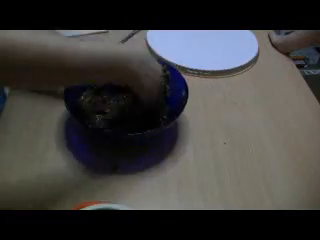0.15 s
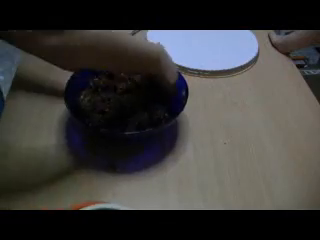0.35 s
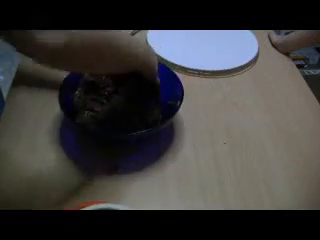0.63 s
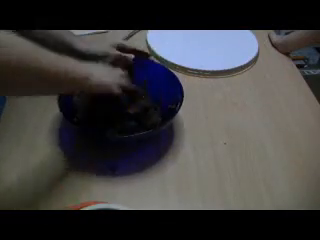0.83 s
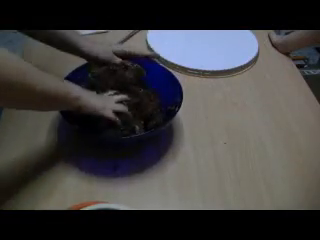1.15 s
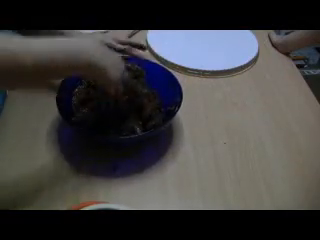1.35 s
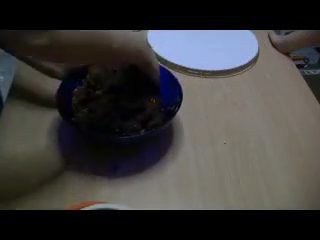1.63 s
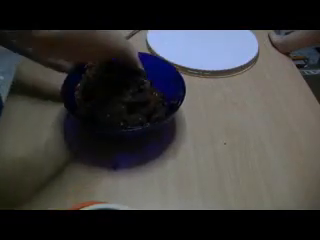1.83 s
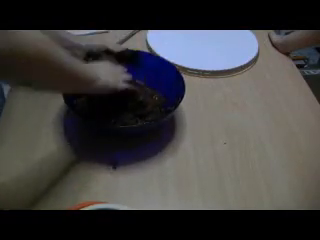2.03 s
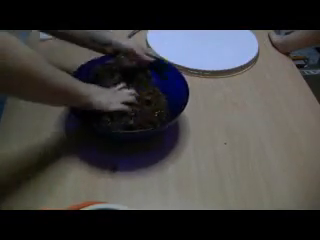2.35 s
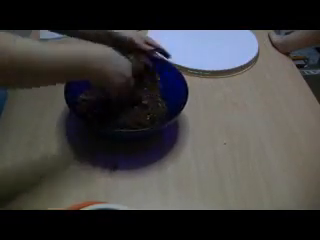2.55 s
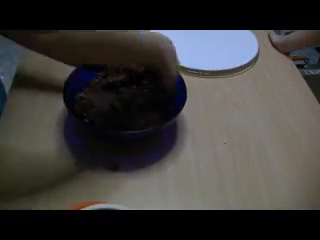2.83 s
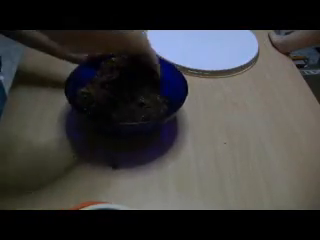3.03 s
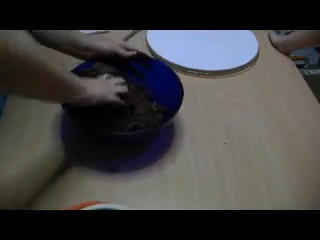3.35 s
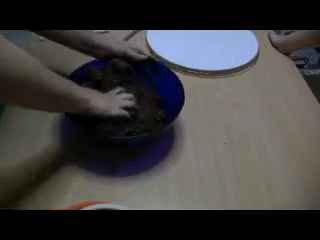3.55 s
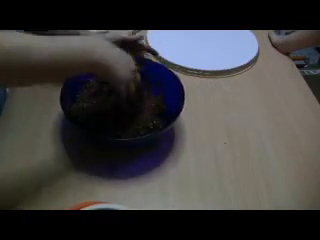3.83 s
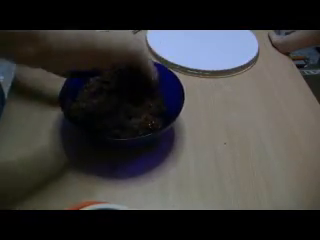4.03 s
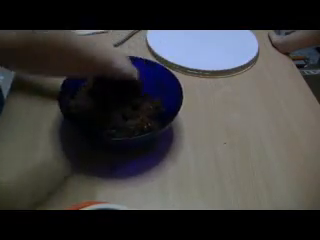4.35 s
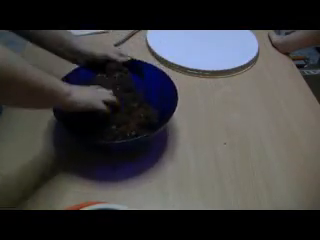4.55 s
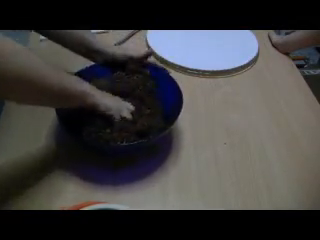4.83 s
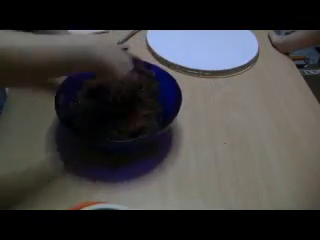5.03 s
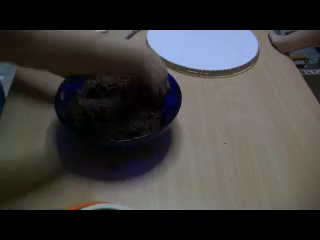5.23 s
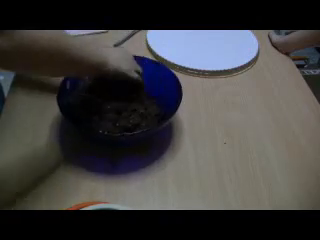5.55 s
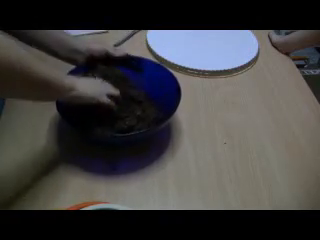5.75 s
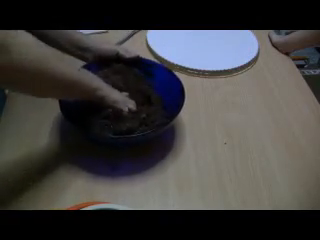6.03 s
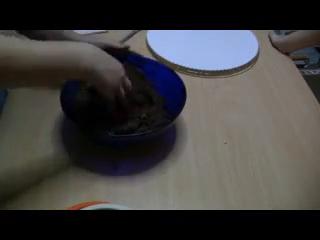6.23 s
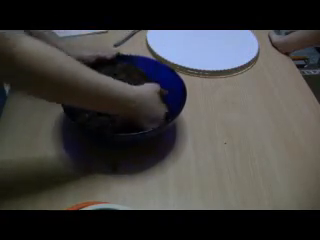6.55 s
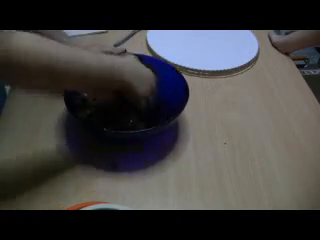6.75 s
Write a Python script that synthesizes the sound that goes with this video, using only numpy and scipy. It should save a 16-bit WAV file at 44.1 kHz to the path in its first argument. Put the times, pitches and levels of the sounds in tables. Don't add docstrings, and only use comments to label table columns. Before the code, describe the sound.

Close in a hard-walled, quiet kitchen, hands rake and press crumbly dough in a glass bowl with uneven dry rustles and scrapes. The bowl lands on a wooden table in clattering knocks early, around two seconds and past four. A finger ring clinks brightly on the rim four times, amid small snaps, pops and a faint squeak. A stereo microphone sits about a metre away, over faint appliance hum.

```python
import sys
import numpy as np
from scipy import signal
from scipy.fft import rfft, irfft
from scipy.io import wavfile
from scipy.ndimage import uniform_filter1d

SR = 44100
rng = np.random.default_rng(int(sys.argv[2]) if len(sys.argv) > 2 else 0)


def undo_db(level):
    steps = np.asarray(level, float) / 20
    return 10 ** steps


def wrap_up_sound(samples):
    columns = np.atleast_2d(samples).T
    tamed = np.clip(columns, -1, 1)
    steps = np.round(tamed * 32767).astype(np.int16)
    wavfile.write(sys.argv[1], SR, steps)


N = 303530

# frequency in Hz, likeness from 0 to 1.
SAME_AIR = [(130, 0.49), (300, 0.042), (1000, 0.045), (3000, 0.58), (14000, 0.71)]


def evened(x):
    return x / np.sqrt(np.mean(x ** 2) + 1e-20)


def read(points, hz):
    f, value = np.transpose(points)
    return np.interp(np.log(hz + 1), np.log(f + 1), value)


def add(mix, s, sound):
    part = mix[round(s * SR):][:len(sound)]
    part += sound[:len(part)]


def coloured(x, points):
    half = read(points, np.fft.rfftfreq(4096, 1 / SR)) / 20 * np.log(10)
    log_gain = np.r_[half, half[-2:0:-1]]
    taps = np.fft.ifft(np.exp(np.conj(signal.hilbert(log_gain)))).real[:2048]
    taps = taps.reshape((1,) * (x.ndim - 1) + (-1,))
    return signal.oaconvolve(x, taps, axes=-1)[..., :x.shape[-1]]


def ring(hz, db, t60, size):
    t = np.arange(size)[:, None] / SR
    return (undo_db(db - 60 * t / t60) * np.sin(2 * np.pi * hz * t)).sum(1)


def diffuse(pair, likeness):
    same = np.clip(read(likeness, np.fft.rfftfreq(pair.shape[1], 1 / SR)), 0, 1)
    a, b = rfft(pair)
    shared, own = np.sqrt((1 + same) / 2) * a, np.sqrt((1 - same) / 2) * b
    return irfft(np.array([shared + own, shared - own]), pair.shape[1])


def kitchen():
    # frequency in Hz, level in dB per Hz.
    air_colour = [(40, -55), (75, -3), (105, -10.5), (200, -20), (330, -11.5), (500, -10.5), (700, -9.5),
                  (1000, -14.5), (2500, -19.5), (12500, -32.5), (16000, -33)]
    # frequency in Hz, level in dB rms.
    hum = [(396, -73), (490, -66), (641, -63), (765, -72.5), (852, -68), (926, -69.5), (1290, -74.5),
           (13680, -71.5)]
    t = np.arange(N) / SR
    hiss = evened(coloured(rng.standard_normal((2, N)), air_colour))
    air = undo_db(-54.5) * diffuse(hiss, SAME_AIR)
    for hz, db in hum:
        drift = np.cumsum(uniform_filter1d(rng.standard_normal(N), 2000)) * 0.00001 * hz
        waver_db = 3 * evened(uniform_filter1d(rng.standard_normal(N), 4000))
        air = air + undo_db(db + 2.5 + waver_db) * np.sin(2 * np.pi * hz * t + drift)
    return air


def grains(per_s, spread_db):
    size = undo_db(spread_db * np.minimum(rng.exponential(1, (2, N)), 4)) * rng.standard_normal((2, N))
    return size * (rng.random((2, N)) < per_s / SR)


def strokes(table, level_db, linger):
    rise_db, release_db_per_s = 21.5, 163
    t = np.arange(0, N + 64, 64) / SR
    s, hold, _, rise, _ = np.transpose(table)[..., None]
    before_db = rise_db * np.maximum(s - t, 0) / rise
    after_db = linger * release_db_per_s * np.maximum(t - s - hold, 0)
    power = (undo_db(level_db[:, None] - before_db - after_db) ** 2).sum(0)
    return np.interp(np.arange(N) / SR, t, np.sqrt(power))


def kneading():
    # frequency in Hz, dB per Hz.
    rustle_colour = [(1470, -36.5), (2500, -8), (2740, -7.5), (3690, -5.5), (7080, -5.5), (12400, -7.5),
                     (15000, -13), (16000, -68)]
    scrape_colour = [(300, -31), (700, -8.5), (1300, 1), (2500, -4.5), (4000, -13), (7000, -21.5)]
    push_colour = [(60, -4), (110, -22.5), (250, -5), (500, -1.5), (900, -3.5), (1800, -21)]
    # full speed reached in seconds, hold in seconds, rustle in dB,
    # rise in seconds, weight on the glass in dB over the rustle.
    rakes = [(.075, 0.0056, -48.5, 0.59, -8.5), (.335, 0.016, -60, .02, -6), (.44, 0.01, -52.5, 0.12, -4.5),
             (.5, 0.26, -59, 0.087, -4), (.775, 0.41, -56, 0.38, -4.5), (1.25, 0.013, -48, 0.1, -1.5),
             (1.368, 0.006, -39, 0.096, -10.5), (1.97, 0.11, -52, 0.074, 8.5), (2.2, 0.25, -59, 0.29, 5),
             (2.561, 0.095, -47.5, 0.073, -5), (3.32, 0.16, -51, 0.63, -14), (3.55, 0.29, -56, 0.15, -11),
             (3.84, 0.034, -45.5, 0.26, -5), (4.105, .07, -61.5, .02, -7), (4.44, 0.051, -49, 0.24, 6),
             (4.7, 0.21, -55.5, 0.73, 4), (5.05, 0.031, -42, 0.17, -7), (5.35, 0.14, -55, 0.11, -15),
             (5.62, 0.073, -47, 0.16, -4.5), (5.78, 0.034, -53, 0.35, -21), (5.97, 0.15, -54.5, 0.45, -4),
             (6.23, 0.048, -44, 0.14, -18), (6.6, 0.13, -55.5, 0.22, -5), (6.86, .02, -45, 0.15, -9)]
    # full weight reached in seconds, hold in seconds, drag on the glass in dB,
    # rise in seconds, push on the table in dB over the drag.
    presses = [(.02, 0.01, -50.5, 0.48, 2), (.36, 0.069, -77, .05, 1), (1.76, 0.1, -55, 0.12, 3.5),
               (2.3, 0.068, -54, 0.13, 1.5), (2.46, 0.11, -59, 0.13, 10), (2.74, 0.014, -62.5, 0.06, 6),
               (3.21, 0.011, -51.5, 0.29, -40), (3.3, 0.12, -71, 0.043, 17.5),
               (3.74, 0.019, -52, 0.62, -4.5), (4.76, 0.06, -59, 0.27, 2.5), (4.97, 0.024, -53.5, 0.066, 2),
               (5.17, 0.017, -68, 0.16, 10), (5.47, 0.087, -51, 0.21, 2.5), (6.17, 0.053, -48, 0.072, -7),
               (6.7, 0.21, -54.5, 0.11, -8)]
    rustle_db, weight_db = np.transpose(rakes)[2::2]
    drag_db, lean_db = np.transpose(presses)[2::2]
    glass_db = rustle_db + weight_db
    scrape_db = np.r_[glass_db, drag_db]
    push_db = np.r_[-70 + 0.64 * (glass_db + 70), drag_db + lean_db]
    flutter = uniform_filter1d(uniform_filter1d(rng.standard_normal(N), 600), 600)
    flutter_db = 0.7 * evened(flutter)
    both = rakes + presses
    rustle = evened(coloured(grains(9000, 0.63), rustle_colour)) * strokes(rakes, rustle_db, linger=1)
    scrape = evened(coloured(grains(3000, 0.96), scrape_colour)) * strokes(both, scrape_db, linger=0.6)
    push = evened(coloured(grains(1200, 0.79), push_colour)) * strokes(both, push_db, linger=0.8)
    return diffuse(undo_db(flutter_db) * (rustle + scrape + push), SAME_AIR)


def knocks():
    # start in seconds, peak in dB, pitch of the push in Hz, chatter in dB over it.
    blows = [(0.105, -37, 332, -2), (0.343, -46.5, 245, -10), (0.606, -36, 394, -8),
             (.625, -24.5, 279, -2.5), (0.6374, -14.5, 473, -4.5), (.655, -43, 765, -14),
             (1.242, -45.5, 750, 7.5), (1.348, -47, 740, 12), (1.747, -39.5, 320, -3),
             (1.889, -35, 304, -9), (1.92, -33, 350, 3), (1.9403, -19.5, 274, -2), (1.996, -7.5, 366, -8),
             (2.017, -16.5, 450, 2), (2.031, -22, 1030, -20), (2.048, -20, 415, -25), (2.169, -36, 443, 0),
             (3.3913, -23, 340, -9), (3.407, -39, 500, -13), (3.47, -40, 530, -3), (3.728, -41, 617, -1),
             (3.878, -45.5, 333, 6), (4.357, -37, 400, 5), (4.37, -21.5, 277, -4), (4.412, -16.5, 270, -24),
             (4.422, -12, 383, 5.5), (4.428, -14.5, 530, -4), (4.439, -19, 570, 0.5),
             (5.967, -31.5, 520, -13), (5.973, -38, 423, 5), (5.98, -37, 454, 0), (5.992, -38, 750, -4),
             (6.13, -38.5, 487, 3.5)]
    # level in dB and t60 in seconds in each row, then their frequencies in Hz.
    modes = [(2, 0.084), (-33, 0.03), (0, 0.54), (-4.5, 0.38), (-7, 0.3), (-6.5, 0.22), (-5, 0.25),
             (-4, .2), (3, .12), (-17, 0.15), (-1, 0.13), (-3.5, 0.13), (-12, 0.16), (-1.5, 0.09),
             (-2, 0.03), (-19, 0.042), (-6, 0.038), (-30, 0.021), (-13, .014), (-25, .012)]
    mode_hz = [115, 200, 250, 325, 362, 397, 456, 543, 592, 688, 770, 826, 906, 1005, 1193, 1290, 1440,
               1650, 2200, 3000]
    # frequency in Hz, level in dB.
    grit_colour = [(500, -29), (1300, -10), (2300, 6), (3500, 1), (5500, -8), (9000, -32)]
    direct, force, grit = np.zeros((3, N))
    t = np.arange(9000) / SR
    gaps = np.diff([row[0] for row in blows], append=N / SR)
    for (s, db, hz, chatter_db), gap in zip(blows, gaps):
        u = t * hz
        push = np.sin(2 * np.pi * u) * np.tanh(2.1 * u) * np.exp(-(u / 0.84) ** 2)
        add(direct, s, -0.8 * undo_db(db) * push)
        contact_hz = 990 * (hz / 350) ** 0.6 * undo_db(0.087 * (db + 8.5))
        contact = np.sin(np.pi * np.minimum(1.77 * t[:300] * contact_hz, 1)) ** 2
        add(force, s, -0.6 * undo_db(db) * contact / contact.sum())
        t60 = min(0.1, 6.1 * gap)
        hits = (rng.random(9000) < 500 / SR) * rng.uniform(-1, 1, 9000)
        chatter = hits * undo_db(chatter_db + 8 - 60 * t / t60)
        add(grit, s, undo_db(db - 6.5) * chatter)
        rebound = np.gradient(contact)
        rebound = 3.4 * rebound * abs(rebound).sum() / contact.sum()
        add(force, s, undo_db(db) * signal.fftconvolve(chatter, rebound)[:9000])
    hz, (db, t60) = np.array(mode_hz), np.transpose(modes)
    t60 = np.minimum(t60, 85 / hz)
    top = ring(hz, db, t60, size=14000)
    for near in rng.uniform(0.799, 1.24, (6, len(hz))):
        top[:9000] += ring(hz * near, db - 7, t60 * 0.49, size=9000)
    return direct + coloured(grit, grit_colour) + undo_db(-25.5) * signal.fftconvolve(force, top)[:N]


def snaps():
    # start in seconds, peak in dB, pitch in Hz.
    smears = [
        (4.3, -37, 1800),
        (5.061, -33, 2780),
        (5.7, -50, 1600),
    ]
    single = [(0.4369, -46, 4100), (0.6385, -35, 3100), (0.7751, -43, 1450), (1.2416, -28, 1690),
              (1.261, -34, 6550), (1.3498, -21.5, 1670), (1.3565, -22.5, 2400), (1.3644, -38, 1680),
              (1.9814, -34, 1570), (2.0033, -14.5, 1840), (2.3291, -34, 1510), (3.7254, -30, 1980),
              (4.4383, -30, 2280), (4.9177, -48, 2050), (5.475, -33, 1550), (6.571, -41, 2440),
              (6.8154, -30.5, 2040)]
    ticks = [(0.3292, -33.5, 9990), (0.6194, -34.5, 7100), (0.7746, -26, 11800), (0.9157, -31, 6820),
             (1.9744, -37, 6450), (2.0844, -25, 10500), (2.1144, -29, 9430), (2.33, -26.5, 7500),
             (3.0644, -26, 8900), (3.0824, -46, 9940), (3.1882, -34, 9800), (3.3017, -31, 7000),
             (3.3214, -25, 10700), (3.4644, -32, 12800), (3.5693, -30.5, 11300), (4.102, -30, 12000),
             (5.607, -27, 10500), (6.0394, -26.5, 10700)]
    out, t = np.zeros(N), np.arange(6000) / SR
    for table, t60 in [(smears, 0.055), (single, 0.011), (ticks, 0.0022)]:
        for s, db, hz in table:
            fade = undo_db(-60 * t / t60) * np.minimum(8 * t / t60, 1)
            burst = np.diff(rng.standard_normal(6000) * fade, prepend=0)
            pitched = np.convolve(burst, ring(hz, 0, 5 / hz, size=400))[:6000]
            mixed = 0.23 * burst / abs(burst).max() + 0.7 * pitched / abs(pitched).max()
            add(out, s, undo_db(db) * mixed)
    return out


def blips(table, rise_s, trim_db=0):
    out, t = np.zeros(N), np.arange(4000) / SR
    u = t / rise_s
    for s, db, hz in table:
        tone = np.sin(2 * np.pi * hz * t * (1 - 0.042 * u / (1 + u)))
        add(out, s, undo_db(db + trim_db) * u * np.exp(1 - u) * tone)
    return out


def specks():
    # start in seconds, peak in dB, pitch in Hz.
    patter = [(0.4371, -37, 9140), (0.6048, -40, 10400), (0.6462, -40, 8610), (0.7504, -35, 12500),
              (0.7744, -41, 13800), (0.9435, -43, 11100), (0.9844, -40, 11100), (1.1046, -40, 11400),
              (1.2553, -41, 8700), (1.3166, -34, 8210), (3.1881, -45, 9710), (3.2994, -33, 9530),
              (3.3253, -37, 10700), (3.3757, -37, 13800), (3.4645, -38, 8410), (3.5693, -40, 11300),
              (3.6022, -34, 10600), (3.7314, -35, 8220), (3.7758, -37, 9470), (3.8157, -34, 9260),
              (3.473, -38, 10500), (3.511, -40, 9000), (1.9, -37, 8500)]
    flicks = [(4.6664, -41, 3410), (4.7764, -35, 3630), (4.8494, -42, 3550), (4.9197, -36, 3020),
              (4.9744, -39, 6310), (5.3064, -47, 3570), (5.3444, -39, 7710), (5.475, -33, 5830),
              (5.6224, -34.5, 3130), (5.9234, -39, 3250), (6.176, -34, 3440), (6.4534, -49, 3750),
              (6.501, -43, 4390), (6.577, -41, 4540), (6.7924, -36, 3960)]
    return blips(patter, 0.0004, -7) + blips(flicks, 0.00047, -7)


def bounces():
    # start in seconds, peak in dB, pitch in Hz.
    landings = [(.627, -29, 336), (.639, -29, 504), (.6395, -45, 2300), (.641, -44, 3670), (.644, -33, 455),
                (1.941, -23, 420), (1.999, -17, 302), (2.004, -40, 1300), (3.392, -36, 443),
                (3.394, -43, 880), (4.371, -29.5, 500), (4.373, -35, 1230), (4.423, -22, 332),
                (4.425, -29, 1360), (4.426, -41, 3850), (4.431, -24, 593), (4.455, -26, 970),
                (5.968, -37, 407), (5.968, -37, 750), (5.974, -37, 405), (6.009, -43, 1160)]
    later = [(0.651, -29, 380), (.668, -29, 846), (.699, -34.5, 840), (0.661, -22.5, 752),
             (0.675, -27.5, 390), (0.686, -28, 940), (0.697, -32, 750), (0.706, -42, 450),
             (0.719, -39, 360), (0.72, -38, 1310), (0.73, -43, 935), (0.732, -45, 370), (1.951, -29, 405),
             (1.961, -30, 380), (1.982, -31, 445), (2.015, -14.5, 360), (2.031, -27, 445),
             (2.049, -21, 390), (2.059, -24, 820), (2.061, -26, 302), (2.072, -22, 740), (2.09, -38, 700),
             (2.093, -38, 390), (2.101, -22.5, 576), (2.109, -34, 417), (2.115, -35, 814),
             (2.127, -47, 370), (2.141, -32, 330), (2.151, -33, 1110), (3.404, -33, 280), (3.414, -47, 533),
             (3.43, -47, 335), (3.443, -41, 625), (3.466, -38.5, 640), (3.488, -50, 430), (4.395, -25, 296),
             (4.398, -33, 716), (4.438, -19, 286), (4.448, -29, 830), (4.463, -27, 540), (4.472, -23, 1090),
             (4.475, -30, 570), (4.482, -33, 710), (4.484, -20.5, 1190), (4.501, -26.5, 514),
             (4.501, -27, 945), (4.511, -25.5, 1040), (4.516, -43, 520), (4.533, -28.5, 1000),
             (4.546, -31, 600), (4.553, -46, 990), (4.562, -33.5, 480), (5.988, -37, 300),
             (5.996, -45, 795), (6.002, -44, 640), (6.017, -55, 634), (6.042, -45, 650), (6.06, -56, 338),
             (6.061, -54, 960)]
    return blips(landings, 0.002) + blips(later, 0.0029)


def clinks():
    starts = [1.3168, 1.7469, 2.9024, 4.1877]
    # peak in dB, crack in dB over the ring, the hand's factor on t60, crack tilt in dB per octave.
    hits = [
        (-24.5, -9, 1.3, 3),
        (-10, 6.5, 0.83, 1.5),
        (-13.5, 1.5, 0.76, -2),
        (-8, -3, 0.34, -2.5),
    ]
    # crack t60 in seconds, factor on t60 of low modes, ring stopped after seconds.
    grips = [
        (.006, 0.39, .06),
        (0.008, 0.65, .13),
        (0.0091, 1.8, 0.15),
        (0.0091, 0.92, .2),
    ]
    # t60 in seconds, then dB at each clink's own spot in each row, then their frequencies in Hz.
    modes = [(0.027, -22, -33, -14, -30), (0.022, -30, -24, -10, -23), (0.084, -30, -20, -15, -31),
             (0.13, -23, -16, -13, -11), (0.15, -6, -14, -9.5, -9.5), (0.18, -3.5, -6.5, -5.5, -8.5),
             (0.29, -13, -11.5, -8.5, -7), (0.062, -5, -5.5, -2, -1.5), (0.065, -13, -10, -9, -5),
             (0.071, -24, -15, -16, -34), (0.04, 1.5, -0.5, -4.5, 1), (0.058, -12, -5, -8, -2),
             (0.071, -3, -13, -4, -3), (0.053, -14, -3, -14, 0), (0.07, -13, -3, -11, 0.5),
             (0.014, -20, -17, 9, -15), (0.13, -18, -6, -15, -8), (0.017, -20, -12, -25, 13.5),
             (0.054, -20, -6, -6, -9), (0.024, -27, -10, -20, -7), (.22, -40, -25, -36, -30)]
    mode_hz = [2530, 1060, 1200, 825, 1398, 2100, 2898, 3785, 4735, 5850, 7000, 7950, 8250, 8660, 9580,
               10100, 10630, 11200, 11810, 13070, 14950]
    # frequency in Hz, level in dB.
    crack_colour = [(500, -30), (1050, 0), (1700, -9), (2700, -8), (4500, -16), (5800, -22), (7200, -5),
                    (9000, 6.5), (12000, -9.5), (13800, -32), (15000, -21), (16000, -53)]
    fizz_colour = [(1200, -21), (1800, -12), (2600, 7), (3300, -3), (5500, -10), (6500, -5), (11000, -3.5),
                   (14000, -11.5)]
    fizz_levels = [-22, -19, -14.5, -24]
    cracks, rims = np.zeros((2, N))
    hz, (t60, *levels) = np.array(mode_hz), np.transpose(modes)
    t = np.arange(12000) / SR
    rise = np.minimum(t / 0.00052, 1) ** 2
    for s, hit, grip, mode_db, fizz_db in zip(starts, hits, grips, levels, fizz_levels):
        db, crack_db, damp, tilt_db = hit
        crack_t60, low, stop_s = grip
        split, twin = rng.standard_normal((2, len(hz)))
        long_t60 = t60 * damp * np.where(hz < 3300, low, 1)
        rim = ring(hz, mode_db, long_t60, size=12000)
        rim += 0.53 * ring(hz * (1 + 0.0029 * twin), mode_db, 0.34 * long_t60, size=12000)
        rim *= undo_db(-900 * np.maximum(t - stop_s, 0))
        rim += 4.34 * ring(hz * (1 + 0.0023 * split), mode_db, t60 * damp * 0.22, size=12000)
        noise = rng.standard_normal(12000)
        colour = [(f, level + tilt_db * np.log2(f / 5000)) for f, level in crack_colour]
        crack = coloured(np.sign(noise) * undo_db(-60 * t / crack_t60) * rise, colour)
        fizz = coloured(noise[::-1] * undo_db(-60 * t / 0.11) * rise, fizz_colour)
        add(rims, s, undo_db(db + fizz_db) * fizz / abs(fizz).max())
        add(rims, s, 0.087 * undo_db(db) * rise * rim)
        add(cracks, s, undo_db(db + crack_db) * crack / abs(crack).max())
    return cracks, rims


def squeaks():
    # start in seconds, peak in dB, pitch in Hz.
    slips = [
        (5.048, -46, 2750),
        (5.06, -39, 2800),
        (5.072, -45, 2780),
        (6.235, -44, 2660),
        (6.25, -48, 2680),
        (6.25, -49, 3870),
        (1.34, -42, 735),
    ]
    return blips(slips, 0.0075)


def pops():
    # start in seconds, peak in dB, pitch in Hz.
    pockets = [(4.749, -32, 1800), (4.7625, -31, 1100), (4.8618, -43, 1590), (4.9162, -47, 2050),
               (4.981, -35, 1660), (5.0015, -48, 1170), (5.3883, -51, 1270), (5.4287, -45, 1240),
               (5.4701, -37, 1920), (5.4981, -46, 1640), (5.5948, -34, 1290), (5.6238, -36, 1300),
               (6.1012, -48, 934), (6.1546, -46, 1430), (6.1726, -44, 3430), (3.5522, -51, 1300),
               (3.5627, -43, 1220), (3.647, -39.5, 1270), (3.7253, -34, 2030), (3.7722, -36, 1185),
               (3.8361, -35, 2920), (3.86, -33, 2560), (2.1948, -32, 1100), (2.2208, -34, 1200),
               (2.2946, -40, 1900), (2.3405, -36, 930), (2.4787, -37, 1460), (2.6239, -47, 1080)]
    return blips(pockets, 0.0013, -7)


def walls(x):
    # frequency in Hz, t60 in seconds.
    decay = [(100, 0.17), (300, 0.54), (1000, 0.58), (3000, 0.5), (8000, 0.5), (14000, 0.34)]
    # frequency in Hz, likeness from 0 to 1.
    likeness = [(100, 0.97), (500, 0.85), (2000, 0.75), (8000, 0.45), (14000, 0.087)]
    first = 260
    taps = np.zeros((2, SR))
    slots = np.arange(first, SR - 20, 14)
    at = slots + rng.integers(0, 14, (2, len(slots)))
    np.put_along_axis(taps, at, rng.choice([-1., 1.], at.shape), 1)
    hz, t, z = signal.stft(diffuse(taps, likeness), SR, nperseg=256)
    tail = signal.istft(z * undo_db(-60 * t / read(decay, hz)[:, None]), SR, nperseg=256)[1]
    tail[:, :first] = 0
    return signal.fftconvolve(x[None], tail / np.linalg.norm(tail[0]), axes=1)[:, :N]


def scene():
    air, hands, wood, crumbs = kitchen(), kneading(), knocks(), snaps()
    taps = specks() + bounces() + squeaks() + pops()
    cracks, rims = clinks()
    wet = undo_db(-3.5) * cracks + undo_db(1) * rims + undo_db(1.87) * wood
    wet += undo_db(1) * crumbs + undo_db(-5.5) * hands[0] + undo_db(-8) * taps
    return cracks + rims + wood + taps + crumbs + walls(wet) + undo_db(2) * hands + air


def roll_off(x):
    return signal.sosfilt(signal.butter(12, 16500, fs=SR, output="sos"), x)


def record(dry):
    # frequency in Hz, left minus right in dB.
    lean = [(60, -2.5), (240, -2), (950, -1), (3770, -0.5), (15000, 0.1)]
    # frequency in Hz, gain in dB.
    low_cut = [(25, -42), (60, -25), (80, -24.5), (97, -9), (130, -1)]
    hz = np.fft.rfftfreq(N, 1 / SR)
    colour = undo_db(np.outer([0.5, -0.5], read(lean, hz)) + read(low_cut, hz)) * (hz < 15720)
    rumble = signal.lfilter([1], [1, -0.98], rng.standard_normal(dry.shape))
    mix = irfft(rfft(dry) * colour, N) + undo_db(-114) * rumble
    return roll_off(mix)


dry = scene()
out = record(dry)
wrap_up_sound(out)
```